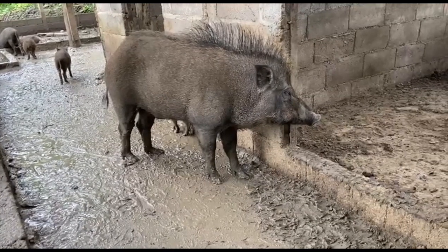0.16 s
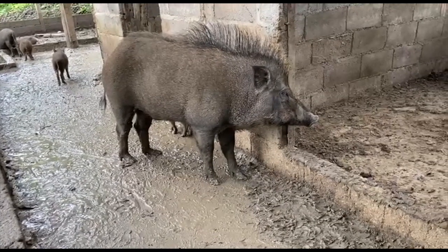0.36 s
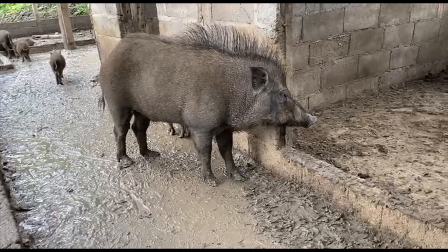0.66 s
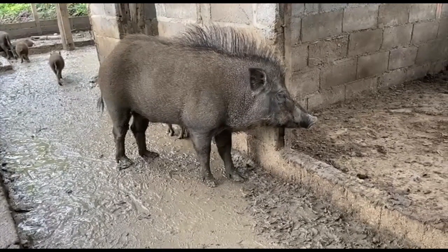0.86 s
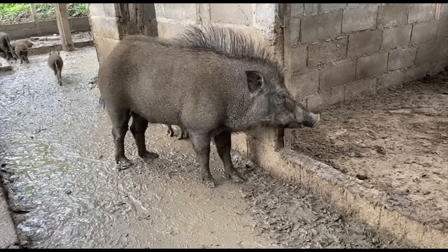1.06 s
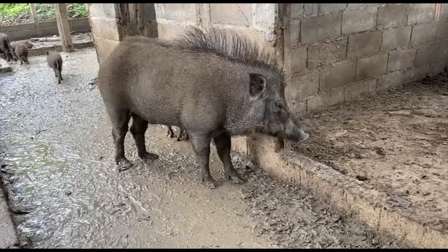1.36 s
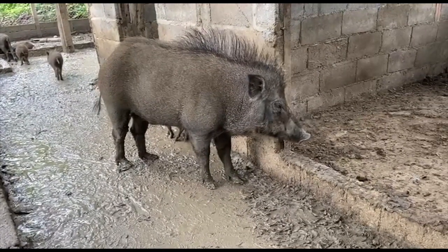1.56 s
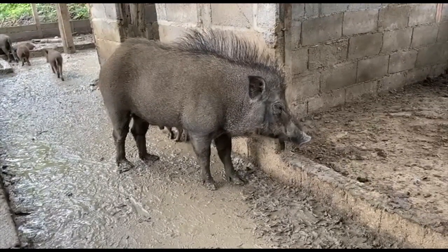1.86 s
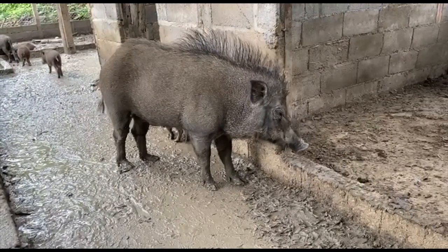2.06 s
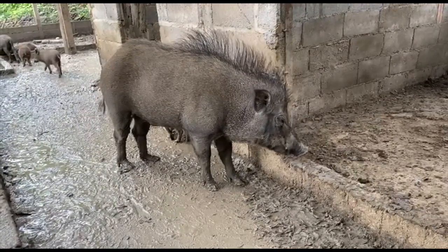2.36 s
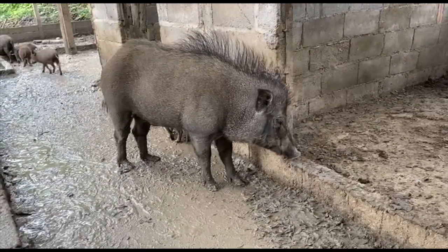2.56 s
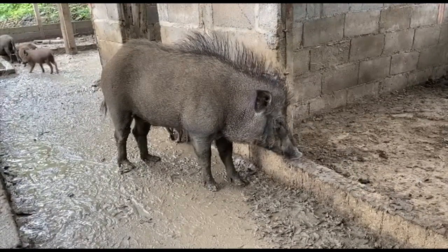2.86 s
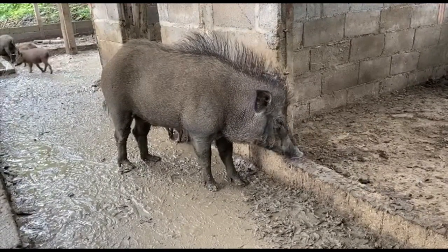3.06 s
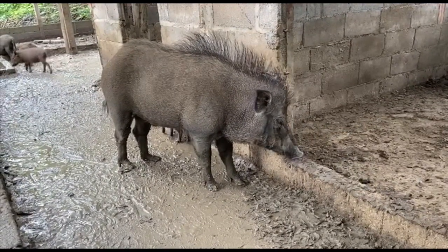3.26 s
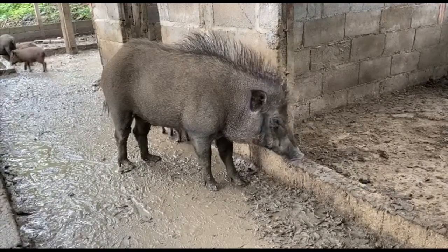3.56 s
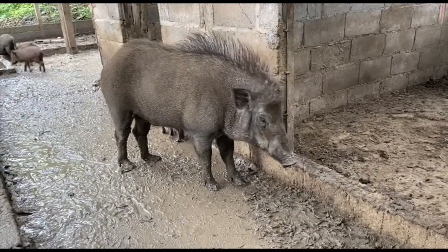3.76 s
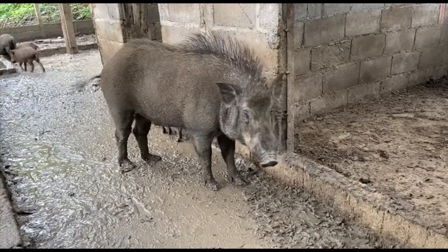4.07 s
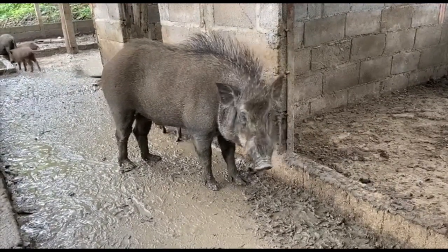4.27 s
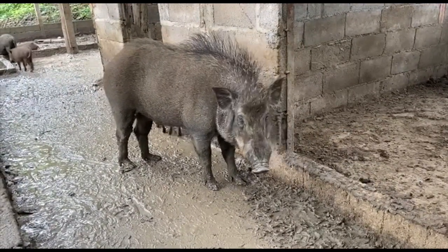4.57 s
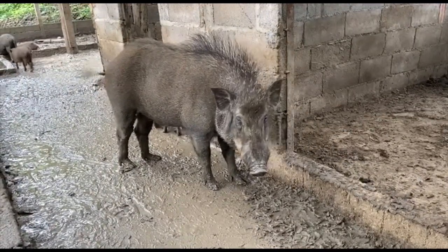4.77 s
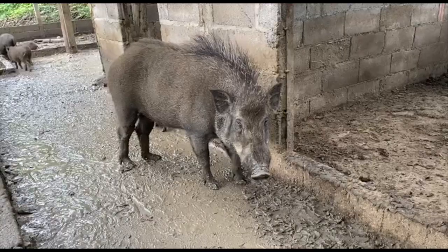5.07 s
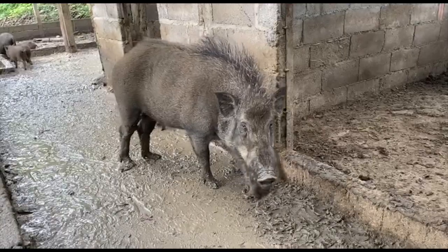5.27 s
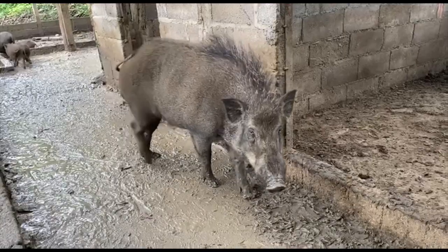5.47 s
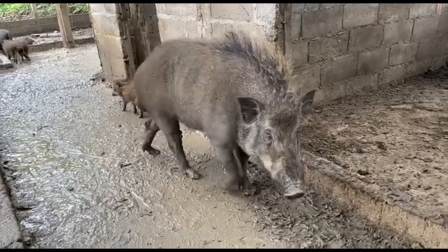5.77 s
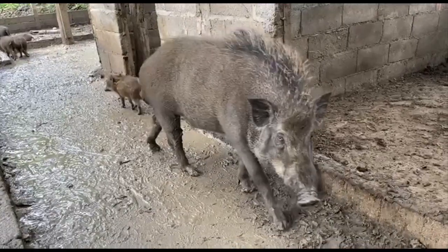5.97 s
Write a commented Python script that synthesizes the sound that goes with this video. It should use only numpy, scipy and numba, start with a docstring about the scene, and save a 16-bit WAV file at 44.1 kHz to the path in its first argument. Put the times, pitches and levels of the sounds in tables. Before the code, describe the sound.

A farm pen outdoors, with a distant engine thudding low, a steady insect hiss and a chick peeping thinly throughout. At 0.3 seconds a bird on the left gives a sharp, high, falling whistle. A nearby sow grunts and snorts at about 0.6, then gives short, low grunts roughly every half second until 2.5. Faint piglet oinks come at 1.7 and 2.3, with a soft wet snuffle at 2.2 and tiny mud squelches scattered around. At 3.3 the sow lets out a brief, rough growl, followed by softer grunts from 4.4 onward. The insects thicken and a low rumble swells from about 4 seconds. The high whistle returns at 4.1, 5.4 and 5.9. From 5 seconds another bird repeats a lower gliding phrase five times, while trotters make small wet clicks in the mud until the end at about 6.

```python
"""A wild sow grunts in a muddy, block-walled pen while piglets answer and trotters squelch.
Flapping vocal folds ring the pigs' throats, air rasps through snouts, the mud gives tiny wet clicks.
Small birds whistle and peep around the yard in thin, gliding tones.
Behind them an engine thuds steadily far away, a faint low tone comes and goes, and insects hiss."""
import sys
import numpy as np
from scipy import signal
from scipy.fft import rfft, irfft
from scipy.io import wavfile
from scipy.ndimage import uniform_filter1d
from numba import njit

SR = 44100
rng = np.random.default_rng(int(sys.argv[2]) if len(sys.argv) > 2 else 0)


def wav_record(signal):
    """Record a signal, one row per channel, as 16-bit PCM in the file named by sys.argv[1]."""
    frames = np.transpose(np.atleast_2d(signal))
    bounded = np.clip(frames, -1, 1)
    # unit amplitude maps onto the largest positive 16-bit level
    quanta = np.round(bounded * 32767).astype(np.int16)
    wavfile.write(sys.argv[1], SR, quanta)


N = 270333
T = np.arange(N) / SR


# Each row: time in seconds, throat level in dB, nasal rasp level in dB.
SNORT_LEVELS = [(.625, -41.5, -55.5), (.632, -38, -46.5), (.642, -46, -44), (.66, -36.5, -45),
                (.68, -34, -50), (.696, -41.5, -55), (.762, -41, -63), (.785, -47.5, -62.5),
                (.803, -52, -72.5)]
GROWL_LEVELS = [(3.311, -39.5, -52), (3.324, -44.5, -59.5), (3.33, -36, -47), (3.341, -44, -51.5),
                (3.347, -33, -48), (3.364, -33.5, -48), (3.384, -35, -55.5), (3.47, -39, -63),
                (3.505, -35.5, -70.5), (3.6, -45, -65), (3.63, -75, -71.5)]
# Each row: resonance in Hz, width in Hz, relative gain in dB.
SNORT_THROAT_MODES = [(137.5, 59, -9.5), (250.7, 66.4, 4.5), (347.2, 120, -1), (543, 137, -13),
                      (833, 130, -18.5), (1235, 210, -25.5)]
GROWL_THROAT_MODES = [(136.8, 88, -4.5), (243.3, 100.7, 1.5), (336.3, 54, 3), (394, 67, -3),
                      (525.1, 120.4, -3.5), (700, 77.4, -12), (939, 99, -19), (1166, 196, -22)]
SNORT_SNOUT_MODES = [(2067, 385, 11.5), (2600, 480, 3.5), (3240, 720, 9), (4080, 560, 5.5),
                     (5840, 4800, 3.5)]
GROWL_SNOUT_MODES = [(2165, 547, 8), (3178, 484, 8), (3485, 550, 8), (4680, 2800, 2.5)]

def sow_growls(sink_per_s=.067, wander=.0219, closing_above_hz=780, closing_db_per_s=37):
    """A snort and a growl: rough flaps ring the throat, duller as the mouth closes; the snout rasps."""
    voice, rasp = np.zeros(N), np.zeros(N)
    for levels, throat_modes, snout_modes in ((SNORT_LEVELS, SNORT_THROAT_MODES, SNORT_SNOUT_MODES),
                                              (GROWL_LEVELS, GROWL_THROAT_MODES, GROWL_SNOUT_MODES)):
        start_s = levels[0][0]
        t = seconds(levels[-1][0] - start_s)
        throat_db, rasp_db = curve(levels, start_s + t)
        flaps, puffs = glottis(t, hz=57.5, jitter=.14, puff_s=.007)
        loose = ramp(t, .06)  # distinct flaps give way to flutter without closure
        flutter, hiss = rng.standard_normal((2, len(t)))
        push = flaps * (.9 - .45 * loose) + .35 * puffs + .6 * loose * flutter
        moving_modes = []
        for hz, width_hz, db in throat_modes:
            drift = 1 - sink_per_s * t + wander * random_drift(17.38)[:len(t)]
            closing_db = closing_db_per_s * t * (hz > closing_above_hz)
            moving_modes.append((hz * drift, width_hz, db - closing_db))
        throat = resonate(push, moving_modes)
        throat /= np.sqrt(smooth(throat ** 2, 480, 300) + 1e-12)  # steady lung pressure evens the flaps
        add(voice, start_s, throat * undb(throat_db) * fade(t, .0016))
        add(rasp, start_s, unit(resonate(puffs + .35 * hiss, snout_modes)) * undb(rasp_db))
    return (pen_echo(rasp, wet_db=-2, t60_s=.2, pan_db=3, spread=.9)
            + pen_echo(voice, wet_db=-11, t60_s=.22, pan_db=-.3, spread=1.4))


# Each row: start in seconds, level in dB, opening resonance in Hz, relative overtone level in dB,
# decay in seconds.
SHORT_GRUNTS = [(.577, -39.5, 249.4, -21, 0.0445), (.943, -40, 414.6, -18.5, 0.0454),
                (1.39, -42, 420.7, -14.5, 0.0403), (1.901, -45, 334, -16.5, 0.028),
                (2.472, -39.5, 414, -16, 0.0321), (4.371, -45, 401, -14, 0.078), (5, -55, 558, -4, 0.035),
                (5.212, -52, 319.4, -16.5, 0.021), (5.731, -45, 300, -9, 0.051)]

def sow_grunts(closed_hz=202, closing_s=.01195, overtone_s=.0175, chest_db=2.5, attack_s=.0029):
    """A few dying flaps; the mouth shuts, so the resonance sinks, overtones vanish, the chest rings on."""
    out, t = np.zeros(N), seconds(.2)
    overtone_modes = [(701.4, 107, -11.5), (877, 246, -11), (1670, 530, -21.5)]
    for start_s, db, open_hz, overtone_db, decay_s in SHORT_GRUNTS:
        flaps, puffs = glottis(t, hz=67, jitter=.03, puff_s=.008)
        push = (flaps + .2 * puffs) * np.exp(-t / decay_s)
        mouth_hz = closed_hz + (open_hz - closed_hz) * np.exp(-t / closing_s)
        mouth = unit(band(band(push, mouth_hz, 40), mouth_hz, 240))
        chest = unit(resonate(push, [(135, 40, -6), (closed_hz, 30, 0)]))
        overtones = unit(resonate(puffs, overtone_modes) * np.exp(-t / overtone_s))
        voice = (mouth + undb(chest_db) * chest + undb(overtone_db) * overtones) * ramp(t, attack_s)
        add(out, start_s, undb(db) * voice / np.std(voice[t < .04]))
    return pen_echo(out, wet_db=-13, t60_s=.3, pan_db=0, spread=1.2)


# Each row: start in seconds, level in dB, resonance in Hz, length in seconds.
PIGLET_OINKS = [(1.65, -51, 675.5, 0.0284), (2.305, -42.5, 636.3, 0.014), (2.32, -55.5, 779, 0.034),
                (2.833, -63, 648.3, 0.0386), (5.874, -54, 669.4, 0.0237)]

def piglets():
    """Small throats: quick flaps in a high, narrow resonance."""
    out = np.zeros(N)
    for start_s, db, hz, length_s in PIGLET_OINKS:
        t = seconds(length_s)
        flaps, puffs = glottis(t, hz=hz / 4, jitter=.05, puff_s=.004)
        voice = resonate(flaps + .2 * puffs, [(hz, 170, 0), (1.7 * hz, 300, -22)])
        add(out, start_s, undb(db) * unit(voice * np.exp(-t / length_s)) * fade(t, .00206))
    return pen_echo(out, wet_db=-7, t60_s=.2, pan_db=-1, spread=.8)


# Each row: time in seconds, level in dB.
SNUFFLE_LEVELS = [(2.15, -65), (2.188, -52.5), (2.2, -54.5), (2.213, -49), (2.232, -55), (2.26, -68)]
# Each row: resonance in Hz, width in Hz, relative gain in dB.
SNUFFLE_MODES = [(1484, 300, 3), (2144, 550, -5), (2650, 330, 1.5), (3200, 440, -2.5)]

def snuffle():
    """Air flutters through a wet snout in two soft pushes."""
    out, start_s = np.zeros(N), SNUFFLE_LEVELS[0][0]
    t = seconds(SNUFFLE_LEVELS[-1][0] - start_s)
    _, puffs = glottis(t, hz=120, jitter=.5, puff_s=.002)
    level_db = curve(SNUFFLE_LEVELS, start_s + t)[0]
    add(out, start_s, unit(resonate(puffs, SNUFFLE_MODES)) * undb(level_db) * fade(t, .005))
    return pen_echo(out, wet_db=-3, t60_s=.15, pan_db=3, spread=.7)


# Each row: start in seconds, level in dB, centre in Hz, length in seconds.
NEAR_SQUELCHES = [(.47, -62, 2330, .02), (.533, -61.5, 1714, 0.031), (1.209, -62, 2340, 0.0238),
                  (1.297, -63, 2180, 0.0255), (1.454, -60.5, 2800, 0.0403), (1.57, -63, 1500, 0.0253),
                  (1.572, -59.5, 4750, 0.0165), (1.934, -60, 2400, 0.0384), (2.568, -63, 2260, 0.019),
                  (2.988, -58.5, 10100, .031), (3.974, -62, 2850, 0.104), (5.15, -54, 3300, 0.0051),
                  (5.161, -49.5, 3250, 0.00854), (5.285, -58, 3300, 0.0083), (5.767, -48, 5360, 0.0083)]

def mud(herd_db=-72, walk_start_s=4.8, walk_db=-66):
    """Near trotters and snouts, the herd rooting further off, and wet ticks once the sow walks."""
    out = np.zeros(N)
    for start_s, db, hz, length_s in NEAR_SQUELCHES:
        add(out, start_s, squelch(db, hz, length_s))
    for when, size, colour in rng.random((55, 3)):
        add(out, when * N / SR, squelch(herd_db + 8 * size, hz=600 * 4.5 ** colour, length_s=.032))
    for when, size, colour in rng.random((14, 3)):
        start_s = walk_start_s + when * (N / SR - walk_start_s)
        add(out, start_s, squelch(walk_db + 6 * size, hz=900 * 4 ** colour, length_s=.012))
    return pen_echo(out, wet_db=4.5, t60_s=.089, pan_db=12, spread=.25)


def squelch(db, hz, length_s, clicks_per_s=900):
    """A swarm of tiny wet clicks that starts sharply and dies away."""
    t = seconds(length_s)
    clicks = rng.standard_normal(len(t)) * (rng.random(len(t)) < clicks_per_s / SR)
    clicks *= undb(3 * rng.exponential(size=len(t)))
    ringing = band(band(clicks, hz, .342 * hz), hz, 3.7 * hz)
    return undb(db) * unit(ringing * fade(t, .0038) * np.exp(-t / length_s))


# Each row: time of the top in seconds, level there in dB, top pitch in Hz, lead-in pitch in Hz,
# lead-in length in seconds, relative lead-in level in dB, half-fall time in seconds, tail in seconds.
NEAR_WHISTLES = [(.309, -36.5, 5756, 4255, .06, 0.5, 0.0277, 0.0279),
                 (4.147, -40.5, 5995, 5570, 0.0333, -4, 0.02685, 0.114),
                 (5.394, -37.5, 5847, 4450, .055, -7.5, .0229, .02644),
                 (5.867, -40.5, 5535, 5310, .036, -4.5, 0.0321, 0.1033)]

def near_bird(leap_s=.0135, rest_hz=3266, slide_hz_per_s=3900, fade_db_per_s=94, hold_s=.0684):
    """Loud whistles from the left: a wiggling lead-in, a leap to the top, a fall; long tails fray."""
    out = np.zeros(N)
    for top_s, db, top_hz, lead_hz, lead_s, lead_db, fall_s, tail_s in NEAR_WHISTLES:
        t = np.arange(-lead_s, tail_s, 1 / SR)
        leap = np.exp(-np.abs(t / leap_s) ** 3)
        wiggle = .0379 * np.cos(2 * np.pi * (t + .041) / .034)
        rise_hz = lead_hz * (1 + wiggle) * (1 - leap) + top_hz * leap
        fall_hz = rest_hz + (top_hz - rest_hz) / (1 + (t / fall_s) ** 2) - slide_hz_per_s * t
        hz = np.where(t < 0, rise_hz, fall_hz)
        shape_db = np.where(t < 0, lead_db * (1 - np.sqrt(leap)), -fade_db_per_s * t)
        fray = ramp(t - hold_s, .012)
        whistle = tone(t, hz, db + shape_db - 11 * fray, waver=.01, flutter_db=2.5 + 2 * fray)
        add(out, top_s - lead_s, whistle * fade(t, .0111))
    return pen_echo(out, wet_db=0, t60_s=.42, pan_db=3, spread=.9) * undb([[2.4], [-2.4]])


# Each row: time of the top in seconds, base level in dB, nominal pitch in Hz, droop depth from 0 to 1.
CHICK_PEEPS = [(.2, -61, 4414, 0.41), (.535, -60, 4547, 0.7), (.873, -59.5, 4490, 0.96),
               (1.047, -59, 4242, 0.48), (1.143, -59, 4474, 0.35), (1.305, -61, 4545, 0.28),
               (1.643, -59.5, 4440, 0.62), (1.815, -57, 4393, 0.85), (1.983, -60, 4384, 0.41),
               (2.158, -54.5, 4497, 0.73), (2.285, -57.5, 4433, 0.74), (2.455, -55.5, 4482, 0.66),
               (2.64, -57, 4637, 0.96), (2.805, -57, 4535, 0.43), (2.975, -55.5, 4491, 0.86),
               (3.135, -57.5, 4258, 0.95), (3.29, -57.5, 4490, 0.97), (3.458, -57, 4374, .9),
               (3.81, -59, 4182, 0.66), (4.344, -58, 4450, 0.95), (4.522, -59, 4370, 0.6),
               (5.042, -59, 4504, 0.67), (5.545, -59.5, 4533, 0.98), (5.725, -58.5, 4500, 0.67)]
# Each row: nominal offset from the top in seconds, pitch ratio at full droop, relative level in dB.
PEEP_SHAPE = [(-.03, .94, -8), (-.014, .985, -2), (0, 1, 0), (.009, .95, -1), (.027, .79, -6)]

def chick():
    """Hoarse peeps, each with its own length and droop, over a faint tone about an octave down."""
    out = np.zeros(N)
    for top_s, db, hz, droop in CHICK_PEEPS:
        stretch = 1 + .25 * rng.uniform(-1, 1)
        t = np.arange(PEEP_SHAPE[0][0] * stretch, PEEP_SHAPE[-1][0] * stretch, 1 / SR)
        bend, shape_db = curve(PEEP_SHAPE, t / stretch)
        for ratio, gain_db in ((.9815, 4.5), (.5, -8)):
            partial_hz = ratio * hz * bend ** droop
            peep = tone(t, partial_hz, db + shape_db + gain_db, waver=.021, flutter_db=3.8)
            add(out, top_s + t[0], peep)
    return pen_echo(out, wet_db=-2, t60_s=.35, pan_db=2.5, spread=.9)


# Each row: time of the accent in seconds, level in dB.
PHRASE_REPEATS = [(5.05, -45), (5.27, -43), (5.489, -43.5), (5.717, -42), (5.954, -44.5)]
# Each row: offset from the accent in seconds, length in seconds, start pitch in Hz, target pitch in Hz,
# relative level in dB.
PHRASE_NOTES = [(-.12, 0.031, 1945, 1794, -15.5), (-.085, 0.01814, 1892, 1727, -14),
                (-.052, .018, 1611, 1538, -11.5), (-.028, 0.01436, 2312, 2499, -9.5),
                (-.002, .02, 2680, 2260, -4), (0.014, 0.02, 2282, 2214, -14)]

def far_bird(glide_s=.00886):
    """A lower phrase of gliding notes, the softer the rougher, repeated, with a long echo."""
    out = np.zeros(N)
    for accent_s, phrase_db in PHRASE_REPEATS:
        for offset_s, length_s, start_hz, target_hz, db in PHRASE_NOTES:
            t = seconds(length_s)
            hz = target_hz + (start_hz - target_hz) * np.exp(-t / glide_s)
            note = tone(t, hz, phrase_db + db, waver=.007 - .001 * db, flutter_db=2.5)
            add(out, accent_s + offset_s, note * fade(t, .003))
    return pen_echo(out, wet_db=-3, t60_s=.7, pan_db=1.5, spread=.9)


# Each row: multiple of the cycle rate, relative level in dB.
ENGINE_ORDERS = [(4, -26.5), (5, -3), (6, -21.5), (7, 5), (8, 4.5), (10, -1)]

def engine(cycle_hz=12.13, level_db=-52):
    """Only low orders carry this far; they share one firing, so they beat at the cycle rate."""
    cycles = np.cumsum(cycle_hz * (1 + .00172 * random_drift(1.353))) / SR
    hum = np.zeros(N)
    for order, db in ENGINE_ORDERS:
        gain = undb(db + 1.2 * random_drift(3))
        hum += gain * np.cos(2 * np.pi * order * cycles + .75 * rng.standard_normal())
    return undb(level_db) * unit(hum)


# Each row: time of the top in seconds, level in dB, rise in seconds, decay in seconds.
LOW_SWELLS = [(4.17, -46.5, 1, 1.06), (4.89, -44, 0.091, 3.1)]

def rumble(rest_db=-51):
    """Low noise under the engine, swelling twice."""
    noise = coloured_noise([(15, -27.5), (30, -39), (50, 1), (68, -3), (95, 0), (125, -13.5),
                            (180, -29), (500, -42.5)])
    swells = [undb(db) * ramp(T - top_s + rise_s, rise_s) * np.exp(-np.maximum(T - top_s, 0) / decay_s)
              for top_s, db, rise_s, decay_s in LOW_SWELLS]
    return noise * np.hypot(undb(rest_db), np.linalg.norm(swells, axis=0))


def drone(start_s=.954, length_s=.87, pitch_hz=175.3, level_db=-61):
    """A soft, slightly wavering tone far away."""
    out, t = np.zeros(N), seconds(length_s)
    hz = pitch_hz * (1 + .012 * random_drift(8)[:len(t)])
    db = level_db + 1.5 * random_drift(8)[:len(t)]
    add(out, start_s, tone(t, hz, db, waver=0, flutter_db=0) * fade(t, .06))
    return out


# Each row: frequency in Hz, relative noise density in dB.
AIR_MID_SPECTRUM = [(25, 4), (70, 6), (140, 4), (300, -0.5), (560, -8.5), (700, -8.5), (1250, -20),
                    (2230, -13), (3100, -22), (4300, -8.5), (5200, -6), (7200, -4.5), (8300, -20.5),
                    (10200, -12), (11200, -27)]
AIR_SIDE_SPECTRUM = [(35, -24), (70, -1.5), (105, -2.5), (160, -12), (500, -14.5), (1100, -18.5),
                     (2240, -24), (3200, -29.5), (4500, -15), (6500, -16), (8100, -6.5), (9400, -29.5)]

def air(mid_db=-55, side_db=-56.5):
    """A wide, smooth hiss of outdoor air and insects."""
    swell_db = .5 * random_drift(5) + .45 * random_drift(28)
    mid = coloured_noise(AIR_MID_SPECTRUM) * undb(mid_db + swell_db)
    side = coloured_noise(AIR_SIDE_SPECTRUM) * undb(side_db + swell_db)
    return np.array([mid + side, mid - side])


# Each row: centre in Hz, width in Hz, relative gain in dB.
INSECT_BANDS = [(4936, 45, -1), (5250, 41, 4.5), (6135, 49, 4.5), (7074, 48, 5), (7410, 67, 0.5)]

def insects(shrill_hz=7262, width_hz=1130, shrill_db=-59.5, tones_db=-58.5, join_s=3.435, rise_s=.95):
    """A steady insect shrill; thinner insect tones join it late."""
    shrill = stereo_noise([(shrill_hz, width_hz, 0)]) * undb(shrill_db)
    tones = stereo_noise(INSECT_BANDS) * undb(tones_db) * ramp(T - join_s, rise_s)
    return (shrill + tones) * undb(.9 * random_drift(12))


def glottis(t, hz, jitter, puff_s):
    """Vocal fold flaps, even at first and then uneven, and the puff of turbulent air after each."""
    timing, strength = rng.standard_normal((64, 2)).T
    periods_s = np.exp(jitter * timing * ramp(np.arange(64) - 2, 4)) / hz
    onsets = ((np.cumsum(periods_s) - periods_s[0]) * SR).astype(int)
    inside = onsets < len(t)
    flaps = np.zeros(len(t))
    flaps[onsets[inside]] = undb(1.3 * strength[inside])
    airflow = signal.lfilter([1], [1, -np.exp(-1 / (puff_s * SR))], flaps)
    return unit(flaps), unit(airflow * rng.standard_normal(len(t)))


def tone(t, hz, db, waver, flutter_db):
    """A sine trembling quickly in pitch and level."""
    wobble, flutter = (unit(smooth(noise, 70, 50)) for noise in rng.standard_normal((2, len(t))))
    phase = 2 * np.pi * np.cumsum(hz * (1 + waver * wobble)) / SR
    return np.sin(phase) * undb(db + flutter_db * flutter) * fade(t, .00083)


def pen_echo(x, wet_db, t60_s, pan_db, spread):
    """Direct sound, close slaps off ground and walls, a diffuse tail; spread makes the ears differ."""
    t = seconds(.7)
    decay = (undb(-60 * t / t60_s) + 1.5 * np.exp(-t / .008)) * (t > .002)
    mid, side = rng.standard_normal((2, len(t))) * decay
    tails = [mid + spread * side, mid - spread * side]
    wet = np.array([signal.fftconvolve(x, tail / np.linalg.norm(tail))[:N] for tail in tails])
    direct = x * undb([[pan_db / 2], [-pan_db / 2]])
    return (direct + undb(wet_db) * wet) / np.hypot(1, undb(wet_db))


def resonate(x, modes):
    """Steep parallel resonances with dark valleys. Each mode: centre in Hz, width in Hz, gain in dB."""
    return sum(undb(db) * band(band(x, hz, .99 * width_hz), hz, .99 * width_hz) * (-1) ** k
               for k, (hz, width_hz, db) in enumerate(modes))


def band(x, hz, width_hz):
    """One resonance, steady or moving."""
    return svf(x, hz * np.ones(len(x)), float(width_hz))


@njit
def svf(x, hz, width_hz):
    """State-variable band-pass with a centre for each sample."""
    out, band_state, low_state = np.empty(len(x)), 0., 0.
    for i in range(len(x)):
        g, damping = np.tan(np.pi * hz[i] / SR), width_hz / hz[i]
        passed = (band_state + g * (x[i] - low_state)) / (1 + g * (g + damping))
        band_state = 2 * passed - band_state
        low_state += 2 * g * passed
        out[i] = damping * passed
    return out


def stereo_noise(modes):
    """Separate resonant noise for each ear, rms 1."""
    return np.array([unit(resonate(noise, modes)) for noise in rng.standard_normal((2, N))])


def coloured_noise(points):
    """Noise at rms 1. Each point: frequency in Hz, relative density in dB."""
    hz, db = np.transpose(points)
    bins_hz = np.maximum(np.fft.rfftfreq(N, 1 / SR), 1)
    gain = undb(np.interp(np.log(bins_hz), np.log(hz), db))
    return unit(irfft(rfft(rng.standard_normal(N)) * gain, N))


def random_drift(rate_hz):
    """Smooth random motion around zero."""
    hold = int(SR / rate_hz)
    steps = np.repeat(rng.standard_normal(N // hold + 1), hold)
    return 2.17 * smooth(steps, hold, hold)[:N]


def smooth(x, first_samples, second_samples):
    return uniform_filter1d(uniform_filter1d(x, first_samples), second_samples)


def curve(rows, t):
    """Each column interpolated against the first."""
    times_s, *columns = np.transpose(rows)
    return [np.interp(t, times_s, column) for column in columns]


def add(out, start_s, x):
    i = max(int(start_s * SR), 0)
    out[i:i + len(x)] += x[:max(N - i, 0)]


def fade(t, edge_s):
    return ramp(np.minimum(t - t[0], t[-1] - t), edge_s)


def ramp(t, length):
    return np.clip(t / length, 0, 1)


def seconds(length_s):
    return np.arange(int(length_s * SR)) / SR


def undb(db):
    return 10 ** (np.asarray(db) / 20)


def unit(x):
    """Scale to rms 1."""
    return x / np.sqrt(np.mean(x ** 2) + 1e-20)


def scene():
    """Pigs, birds and the yard around them."""
    pigs = sow_growls() + sow_grunts() + piglets() + snuffle() + mud()
    birds = near_bird() + chick() + far_bird()
    return pigs + birds + engine() + rumble() + drone() + air() + insects()


def record(dry):
    """Steep low-pass on the treble."""
    cutoff_hz = 11050
    return signal.sosfilt(signal.ellip(12, .2, 80, cutoff_hz, fs=SR, output="sos"), dry)


dry = scene()
out = record(dry)
wav_record(out)
```